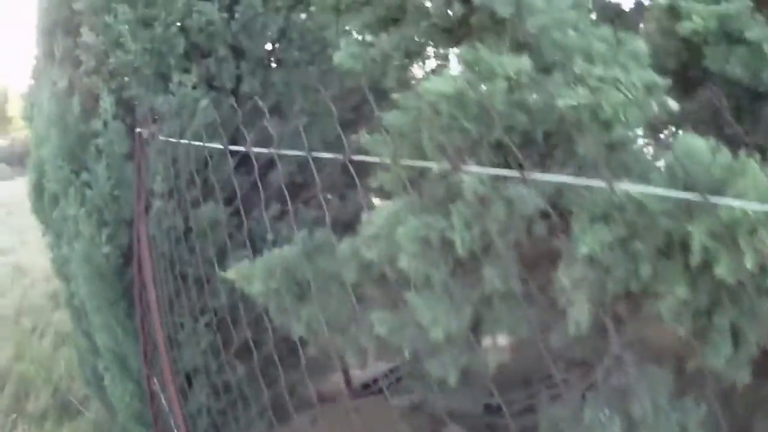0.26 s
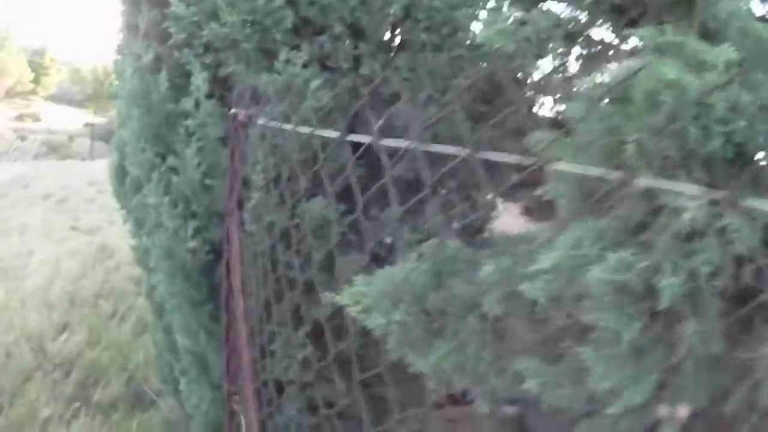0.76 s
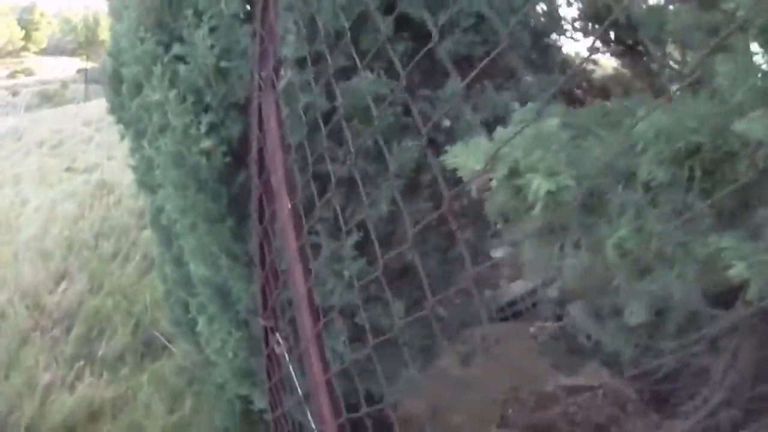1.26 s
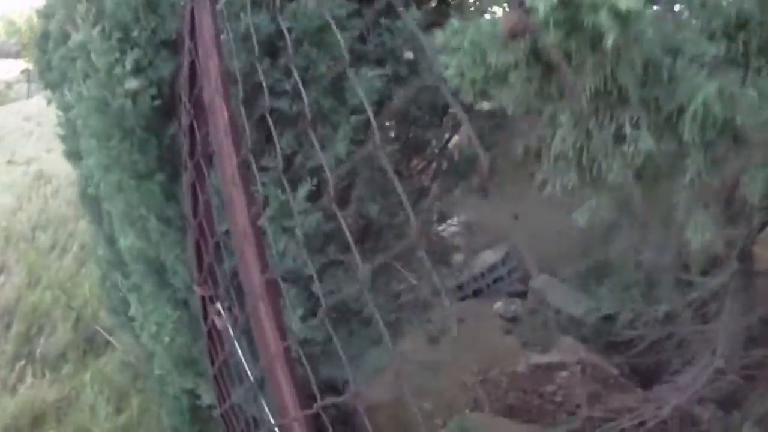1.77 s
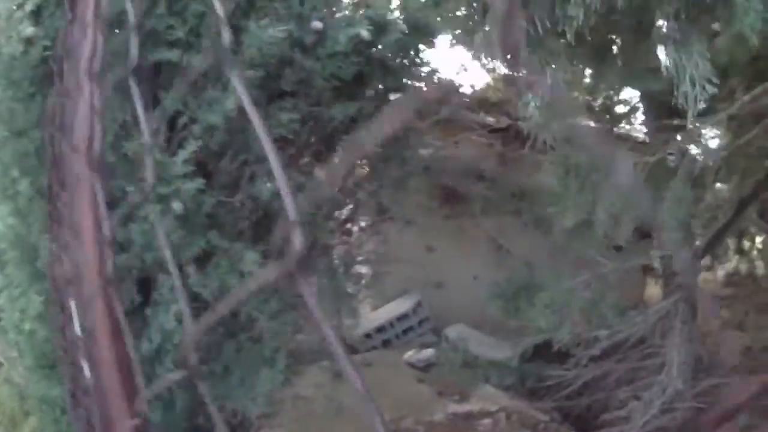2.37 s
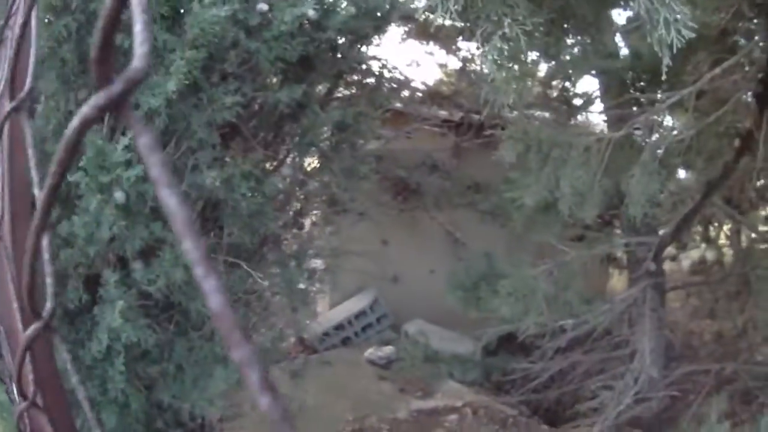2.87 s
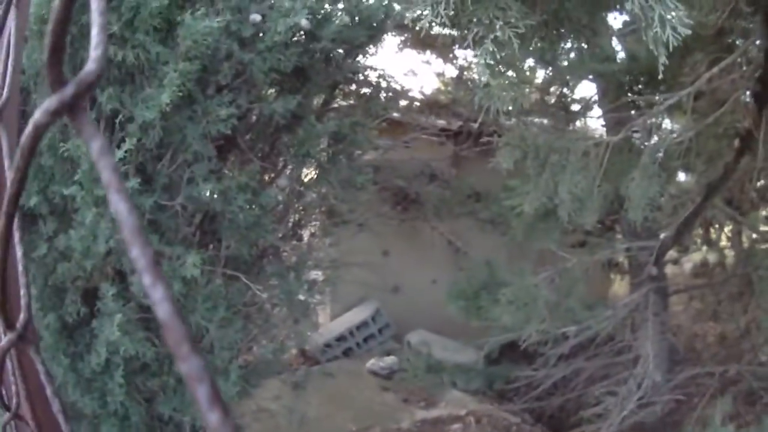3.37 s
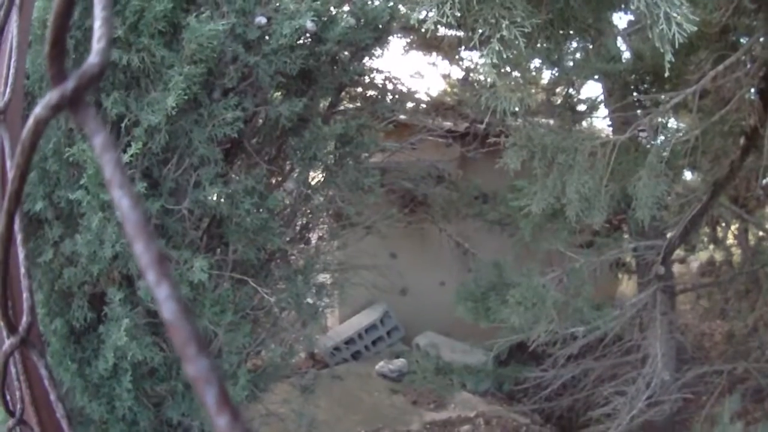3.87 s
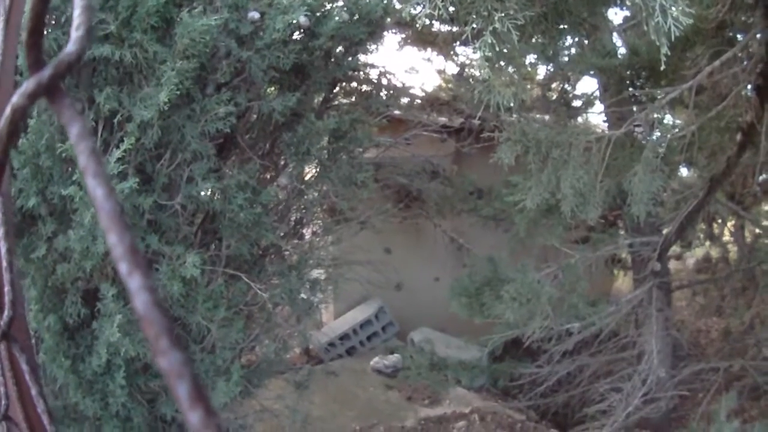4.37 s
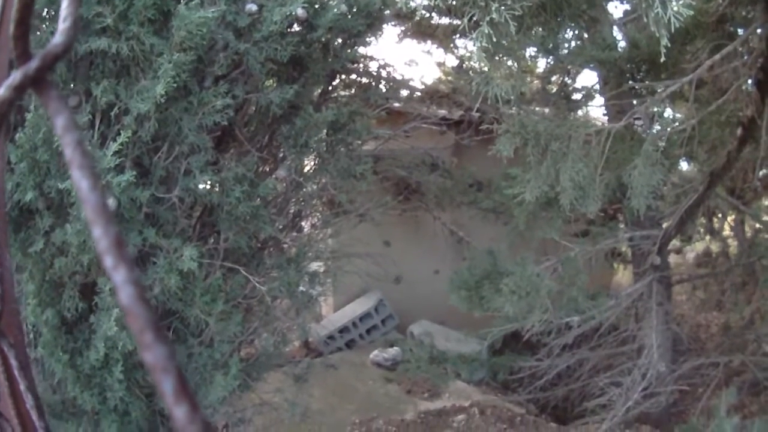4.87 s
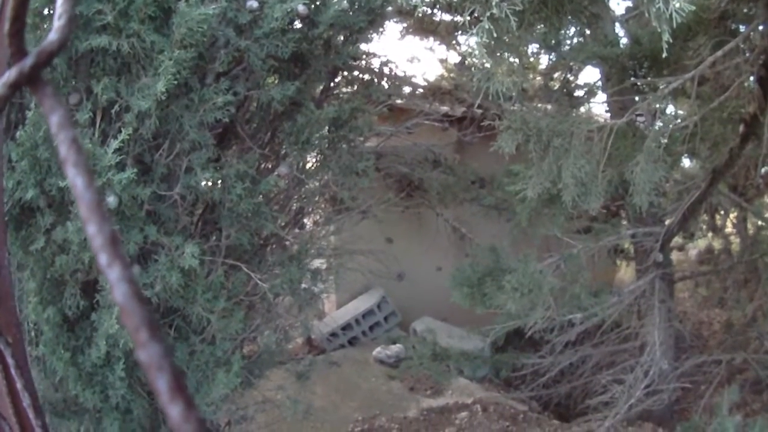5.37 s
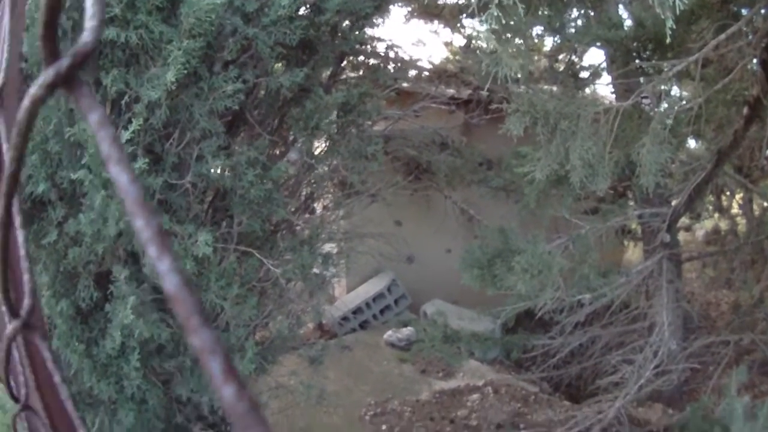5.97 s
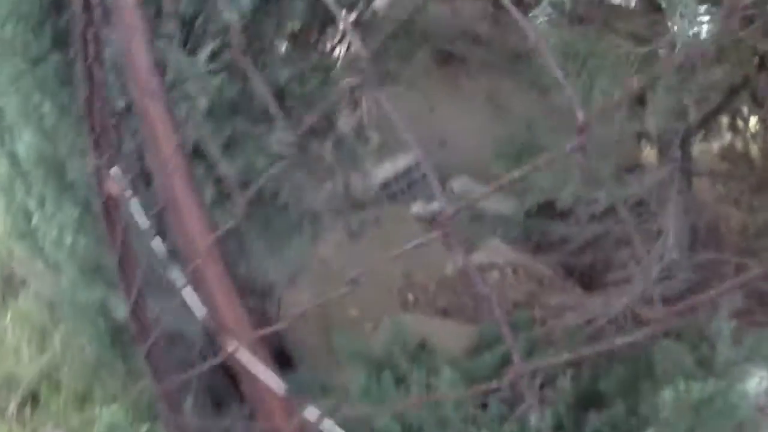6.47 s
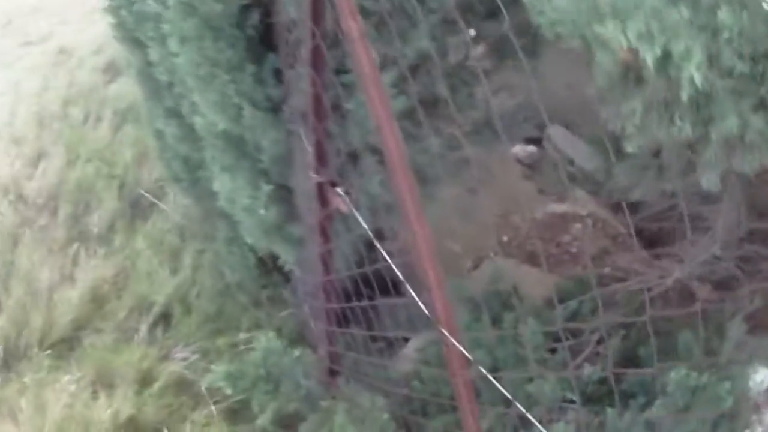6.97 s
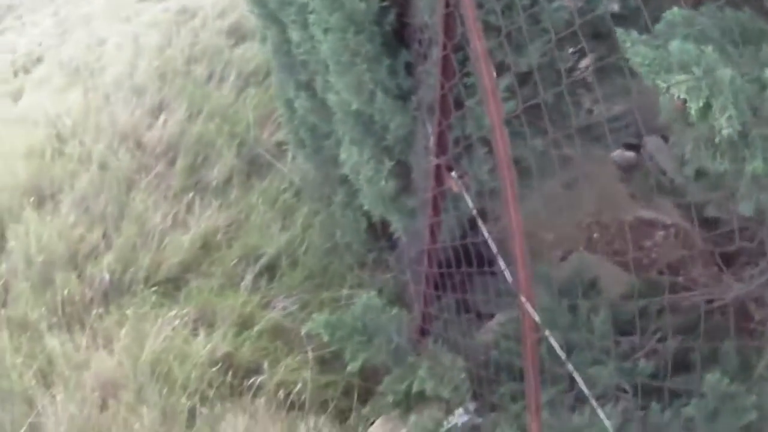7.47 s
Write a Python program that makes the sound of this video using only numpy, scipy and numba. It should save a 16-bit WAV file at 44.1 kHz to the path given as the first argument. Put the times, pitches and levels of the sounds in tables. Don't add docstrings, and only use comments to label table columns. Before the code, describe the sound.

Close, boxy handling rubs and ticks with faint snapping twigs, sharp clacks against wire mesh, then a loud scraping slide through long grass.

```python
import sys
import numpy as np
from scipy import signal
from scipy.fft import rfft, irfft
from scipy.io import wavfile
from scipy.ndimage import uniform_filter1d
from numba import njit

SR = 44100
rng = np.random.default_rng(int(sys.argv[2]) if len(sys.argv) > 2 else 0)


def voltage_ratio(level):
    return 10 ** (np.asarray(level, float) / 20)


def wav_record(signal):
    frames = np.transpose(np.atleast_2d(signal))
    bounded = np.clip(frames, -1, 1)
    quanta = np.round(bounded * 32767).astype(np.int16)
    wavfile.write(sys.argv[1], SR, quanta)


N = 340893

# frequency in Hz, density in dB per Hz.
RASP_COLOUR = [(1880, -44.5), (3200, -5), (3800, 4), (4200, -4), (4580, 1), (4760, -0.5), (4950, -9),
               (5310, -5), (6200, -2.5), (7640, -14.5), (9000, -20), (11700, -27), (19800, -120)]
# frequency in Hz, density in dB per Hz.
CLICK_COLOUR = [(1880, -16.5), (3200, -5.5), (6140, -5.5), (8600, -25), (11500, -15.5), (15200, -16),
                (16500, -9)]
# frequency in Hz, density in dB per Hz.
LEAF_COLOUR = [(5290, -38), (9000, -14.5), (10100, -10), (11800, -1), (13300, -1.5), (15100, -3),
               (16000, 0.5)]


def unit(x):
    return x / np.sqrt(np.mean(x ** 2))


def filtered(x, design):
    return signal.sosfilt(design, x)


def highpass(x, order, hz):
    return filtered(x, signal.butter(order, hz, "high", fs=SR, output="sos"))


@njit
def svf(x, hz, width):
    y, band, low = np.empty(len(x)), 0., 0.
    for i in range(len(x)):
        g, k = np.tan(np.pi * hz[i] / SR), width / hz[i]
        v = (band + g * (x[i] - low)) / (1 + g * (g + k))
        band, low, y[i] = 2 * v - band, low + 2 * g * v, k * v
    return y


def svf_twice(x, hz, width):
    return svf(svf(x, hz, width), hz, width)


def colour(x, points, size=2048):
    hz, db = np.transpose(points)
    log_hz = np.log(np.maximum(np.arange(size // 2 + 1), .5) * SR / size)
    cepstrum = irfft(np.log(voltage_ratio(np.interp(log_hz, np.log(hz), db))))
    cepstrum[1:size // 2] *= 2
    cepstrum[size // 2 + 1:] = 0
    response = irfft(np.exp(rfft(cepstrum)))
    return signal.fftconvolve(x, response / np.sqrt(np.sum(response ** 2)))[:N]


def drift(rate):
    k = int(SR / rate)
    held = np.repeat(rng.standard_normal(N // k + 1), k)
    return unit(uniform_filter1d(held, k)[:N])


def grains(rate, spread_db, smooth):
    chance = rng.random(N) < rate / SR
    size_db = spread_db * np.minimum(rng.exponential(size=N), 2.0)
    slips = chance * rng.standard_normal(N) * voltage_ratio(size_db)
    return unit(unit(slips) + smooth * rng.standard_normal(N))


def strokes(table, attack, release, rest_db):
    t = np.arange(0, N + 64, 64) / SR
    s, hold, db = np.transpose(table)[:, :, None]
    rise = attack * np.maximum(s - t, 0)
    fall = release * np.maximum(t - s - hold, 0)
    total = 10 * np.log10(np.sum(voltage_ratio(db - rise - fall) ** 2, axis=0) + voltage_ratio(rest_db) ** 2)
    return np.interp(np.arange(N) / SR, t, total)


def shell(ring, lid, ring_hz, width_hz):
    # frequency in Hz, width in Hz, level in dB.
    lid_modes = [(977, 48, -5.5), (1109, 243, 0), (1404, 244, -6.5), (1565, 150, -7.5)]
    steep = signal.cheby2(6, 40, 3000, fs=SR, output="sos")
    narrow = svf_twice(ring, ring_hz, width_hz)
    skirt = voltage_ratio(-10) * svf(ring, ring_hz * 1.185, 430.0)
    plate = sum(voltage_ratio(db) * svf(lid, np.full(N, 1. * hz), 1. * width) for hz, width, db in lid_modes)
    return filtered(narrow + skirt, steep), filtered(highpass(plate, 3, 820), steep)


def contacts(table, shape, ring_hz, width_hz, gains_db, treble):
    push = np.full((3, N + SR), 1e-18)
    jitter = rng.standard_normal((len(table), 15000))
    t = np.arange(15000) / SR
    for (s, db, lid, edge, length, *more), noise in zip(table, jitter):
        force, sharp = shape(t, noise, np.clip(length, .004, .3), *more)
        at = int(s * SR)
        push[:, at:at + len(t)] += voltage_ratio(db + np.array([[0], [lid], [edge]])) * [force, force, sharp]
    push = push[:, :N] * voltage_ratio(np.array(gains_db))[:, None]
    return sum(shell(push[0], push[1], ring_hz, width_hz)) + colour(push[2], treble)


def rings(table, rough=0.):
    out, t = np.zeros(N + SR), np.arange(SR // 2) / SR
    tremble = uniform_filter1d(rng.standard_normal((len(table), len(t))), size=40) * np.sqrt(40) / 2
    for (s, hz, db, t60), shake in zip(table, tremble):
        wave = np.sin(2 * np.pi * hz * t + rough * shake * np.minimum(t * hz, 1))
        out[int(s * SR):][:len(t)] += voltage_ratio(db - 60 * t / max(t60, .004)) * wave
    return out[:N]


def outdoor_floor():
    # frequency in Hz, density in dB per Hz.
    hiss_colour = [(18, -47), (30, -19), (229, -5), (298, -4.5), (694, -4.5), (904, -1), (1380, -5),
                   (1840, -19), (2280, -20.5), (3050, -18.5), (8760, -37.5), (15200, -28), (16500, -29)]
    hiss = unit(colour(rng.standard_normal(N), hiss_colour))
    whine = np.sin(2 * np.pi * 7880 * np.arange(N) / SR)
    return voltage_ratio(-50.5 + .5 * drift(7.2)) * hiss + voltage_ratio(-84) * whine


def grip():
    # time in seconds, ring in Hz, palm level in dB, lid over ring in dB.
    grip_rows = [(0.0, 1780, -56, -15), (0.08, 1895, -46, -9.5), (0.22, 2040, -54, -6.5),
                 (0.4, 1860, -45.5, -7), (0.54, 1890, -50.5, -9), (1.0, 1800, -51, 1),
                 (1.17, 1990, -56, -8), (1.32, 1810, -58.5, -3.5), (1.45, 1870, -47, -9.5),
                 (1.64, 1820, -49.5, -6), (1.78, 1990, -49.5, -10), (2.0, 1980, -50.5, -11.5),
                 (2.13, 1740, -58, -6), (2.45, 1930, -56, -4), (2.7, 1770, -53.5, -6.5),
                 (3.05, 1980, -47.5, -8), (3.24, 1964, -55, -10.5), (3.4, 1864, -54, -6),
                 (3.85, 1900, -46.5, -4), (4.22, 1850, -60.5, -4), (4.63, 1884, -48, 2.5),
                 (5.21, 1800, -62.5, -11), (5.73, 1690, -56.5, 2), (5.85, 1846, -47, -4),
                 (5.98, 1880, -45, -1), (6.2, 1840, -61, -6), (6.69, 1824, -54.5, -5.5),
                 (7.02, 2052, -53, -11), (7.28, 1965, -58, -8.5), (7.55, 1885, -58, -10),
                 (7.73, 1920, -60, -19)]
    s, *columns = np.transpose(grip_rows)
    return [np.interp(np.arange(N) / SR, s, column) for column in columns]


def hand_strokes():
    # start in seconds, hold in seconds,
    # ring in dB, rasp over ring in dB.
    stroke_rows = [(0.03, 0.054, -23.5, -22.5), (0.14, 0.035, -34, -21), (0.22, 0.024, -34.5, -24),
                   (0.34, 0.11, -29.5, -22.5), (0.51, 0.061, -25.5, -23.5), (0.62, .14, -37, -25.5),
                   (0.86, 0.12, -43.5, -21), (1.12, 0.19, -29.5, -29), (1.39, 0.18, -29, -24.5),
                   (1.63, 0.026, -30.5, -24), (1.745, 0.1, -31, -26.5), (1.86, 0.15, -29.5, -29),
                   (6.27, 0.019, -42, -20), (6.38, 0.021, -37.5, -17.5), (6.5, 0.049, -29, -23.5),
                   (6.6, 0.034, -42, -20), (6.72, 0.21, -28, -25.5), (6.9, 0.06, -22.5, -34),
                   (6.99, 0.075, -22.5, -33), (7.085, 0.15, -26, -28), (7.3, 0.22, -30.5, -24),
                   (7.57, 0.079, -27.5, -26),
                   (2.076, 0.066, -45.5, -16), (2.247, 0.025, -37, -21.5), (2.436, 0.033, -37, -27),
                  (2.826, .1, -38, -23), (2.964, 0.087, -30, -21.5), (3.043, 0.052, -28, -22.5),
                  (3.236, 0.053, -30.5, -28), (3.308, 0.088, -36.5, -21.5), (3.493, 0.11, -34.5, -19.5),
                  (3.605, 0.1, -31.5, -18), (3.727, 0.21, -31.5, -20), (4.031, 0.095, -43.5, -23),
                  (4.44, 0.29, -53, -21), (4.9, 0.027, -45, -31), (5.863, 0.33, -38.5, -22)]
    moves = stroke_rows
    attack, release = 172, 520
    ring_db = strokes([(s, hold, db) for s, hold, db, _ in moves], attack, release, -55)
    rasp_db = strokes([(s, hold, db + up) for s, hold, db, up in moves], attack, release, -72)
    return ring_db, rasp_db


def rubbing(ring_db, ring_hz, body_db, lid_db, rasp_db):
    # frequency in Hz, density in dB per Hz.
    palm_colour = [(15, -46), (25, -20), (199, -4.5), (240, -1), (549, 5.5), (744, 3), (800, -26),
                   (1040, -39), (1760, -120)]
    flutter = np.minimum(.5 * drift(42) + 1.16 * drift(120), 2.5)
    scrape = grains(2500, 4.0, 1.26)
    lid_scrape = grains(900, 1.8, 1.0) * voltage_ratio(flutter + drift(60))
    wander_hz = ring_hz * (1 + 0.032 * drift(45))
    ring, lid = shell(scrape * voltage_ratio(flutter), lid_scrape, wander_hz, 340.)
    body = colour(grains(300, 3.3, 0.97) * voltage_ratio(flutter + .5 * drift(25)), palm_colour)
    rasp = colour(scrape * voltage_ratio(0.57 * flutter + 1.7 * drift(28)), RASP_COLOUR)
    flank_band = signal.cheby2(3, 30, [1900, 3150], "band", fs=SR, output="sos")
    flank = filtered(scrape * voltage_ratio(flutter), flank_band)
    pressed = unit(ring) + voltage_ratio(lid_db) * unit(lid)
    drag = unit(rasp) + voltage_ratio(-0.5) * unit(flank)
    return voltage_ratio(ring_db) * pressed + voltage_ratio(body_db) * unit(body) + voltage_ratio(rasp_db) * drag


def leaves(swish_db):
    # start in seconds, peak in dB, 4-8 kHz share in dB.
    snap_rows = [(0.0318, -49, 0), (0.68, -32, -5), (1.6561, -33, -7), (1.6694, -38, -9),
                 (1.6945, -41, -15), (1.8986, -36, -20), (1.9824, -37, -19), (2.252, -33.5, -5),
                 (2.429, -53, 13), (2.372, -48, 0), (3, -50, 8), (2.5183, -30, -8), (3.32, -33, -12),
                 (3.4032, -43, -14), (3.904, -43.5, 19), (4, -43.5, 2), (3.195, -55, 14), (1.026, -56, 16),
                 (5.5542, -54, 14)]
    high, mid = np.zeros((2, N))
    t = np.arange(300) / SR
    for (s, db, share_db), noise in zip(snap_rows, rng.standard_normal((len(snap_rows), len(t)))):
        high[int(s * SR):][:len(t)] += voltage_ratio(db - 3.0 - 60 * t / 0.013) * noise
        mid[int(s * SR):][:len(t)] += voltage_ratio(db + share_db - 2.0 - 60 * t / 0.0039) * noise
    swish = voltage_ratio(swish_db + 1.0 * drift(35)) * grains(2400, 2.3, 0.71)
    return colour(swish + high, LEAF_COLOUR) + colour(mid, RASP_COLOUR)


def catches():
    # peak time in seconds, peak in dB, ring in Hz, width in seconds.
    catch_rows = [(0.0443, -17, 1750, 0.0016), (0.0698, -13.5, 1850, 0.005), (0.0917, -17, 1760, 0.0015),
                  (0.0967, -15, 1960, 0.0034), (0.1077, -18, 1850, 0.0022), (0.21, -19, 1970, 0.0027),
                  (0.2258, -11.5, 2030, 0.005), (0.2319, -16, 1870, 0.0014), (0.2348, -15, 1880, 0.0015),
                  (0.4443, -22, 1910, 0.0049), (0.5304, -14, 1940, 0.0018), (0.5407, -12.5, 1884, 0.0051),
                  (0.55, -18, 1900, 0.003), (0.565, -18, 1840, 0.0042), (1.1445, -19.5, 1920, 0.0065),
                  (1.1743, -20, 1950, 0.0047), (1.3933, -19.5, 1750, 0.0032), (1.5322, -19, 1810, 0.0024),
                  (1.8538, -17, 1990, 0.0033), (3.052, -15, 1920, 0.0027), (3.0577, -14, 1840, 0.0031),
                  (3.0697, -11, 2040, 0.0027), (3.2376, -21, 1970, 0.0022), (3.2709, -21, 1920, 0.0039),
                  (3.6162, -16, 1926, 0.0076), (3.6213, -18, 1890, 0.0016), (3.685, -18, 1880, 0.0077),
                  (3.698, -21, 1800, 0.0036), (6.1113, -8.5, 1900, 0.0047), (6.1208, -15, 1880, 0.0025),
                  (6.5238, -17.5, 1770, 0.0044), (6.8956, -17, 1900, 0.0047), (6.9216, -13.5, 1960, 0.0024),
                  (6.9501, -13, 2030, 0.0062), (6.9742, -11.5, 1900, 0.0036), (6.9891, -7, 1990, 0.0029),
                  (6.9977, -10.5, 2010, 0.0046), (7.003, -13, 2040, 0.0016), (7.0125, -9, 2020, 0.0059),
                  (7.0217, -11.5, 2090, 0.0024), (7.0309, -9, 1980, 0.0033), (7.035, -15, 2020, 0.0023),
                  (7.0432, -14, 1990, 0.0023), (7.0599, -12, 2070, 0.0037), (7.1187, -14, 1990, 0.0077)]
    driven_rows = [
        (5.8525, 0, 1860, 0.006),
        (5.859, 1, 1900, 0.005),
        (4.6625, -3, 1890, 0.0045),
        (4.6705, -9, 1900, 0.006),
        (0.2185, -17, 1990, 0.004),
    ]
    rows = [*catch_rows, *driven_rows]
    out, t = np.zeros(N), np.arange(-600, 600) / SR
    tremble = uniform_filter1d(rng.standard_normal((len(rows), len(t))), size=90) * np.sqrt(90)
    for (s, db, hz, width), shake in zip(rows, tremble):
        side = width * np.where(t < 0, 1.05, 1.25)
        swell = voltage_ratio(db - 1.0 - 7 * (2 * t / side) ** 2)
        out[int(s * SR) - 600:][:len(t)] += swell * np.sin(2 * np.pi * hz * t + .3 * shake)
    return filtered(out, signal.butter(3, [1300, 2550], "band", fs=SR, output="sos"))


def scuff(t, noise, length):
    force = 0.09 * noise * np.sin(np.pi * np.minimum(t / length, 1) ** 0.61) ** 2
    return force, force


def scuffs(ring_hz):
    # start in seconds, peak in dB, lid in dB, rasp in dB, length in seconds.
    scuff_rows = [(0.082, -16, -2.5, -21, 0.028), (0.2175, -15, -4, -31, 0.024),
                  (1.27, -26, -10, -28, 0.037), (1.553, -24, -13, -32, 0.014),
                  (1.745, -19.5, -20, -35, 0.062), (1.922, -28, -14, -33, 0.02),
                  (4.688, -26, -5, -46, 0.098), (5.486, -19.5, -7, -35, 0.032),
                  (5.505, -28.5, -10, -39, 0.08), (5.897, -16, -10, -28, 0.012),
                  (5.905, -18, -8, -41, 0.035), (6.122, -13, -15, -28, 0.012), (0.515, -19, -8, -24, 0.03),
                  (1.66, -34.5, 17, -12, 0.039), (3.259, -22, -29, -45, 0.034),
                  (4.715, -30, 9.5, -33, 0.02), (5.963, -14, -13, -43, 0.016),
                  (6.1044, -18, -8, -30, 0.024), (7.215, -21, -30, -45, 0.021),
                  (0.141, -23, -13, -27, 0.033),
        (3.206, -21, -22, -35, 0.049),
    ]
    return contacts(scuff_rows, scuff, ring_hz, 330.0, [31, 28, 16], RASP_COLOUR)


def crackle(rubbed):
    # frequency in Hz, density in dB per Hz.
    crackle_colour = [(3000, -28), (5500, -6), (8500, 0), (12000, 3), (16000, 3)]
    pressure = np.minimum(uniform_filter1d(rubbed ** 2, size=90), .025)
    return voltage_ratio(-19.5) * pressure * unit(colour(grains(1500, 2, .8), crackle_colour))


def thumps():
    # start in seconds, peak in dB, frequency in Hz, t60 in seconds.
    thump_rows = [(0.3238, -13, 620, 0.0045), (1.671, -33, 600, 0.03), (3.018, -32.5, 534, 0.042),
                  (3.446, -40.5, 315, 0.021), (3.89, -30, 476, 0.0039), (4.092, -34.5, 710, 0.041),
                  (4.387, -29, 436, 0.013), (4.4216, -8, 950, 0.016), (4.4165, -13, 420, 0.014),
                  (4.574, -30.5, 680, 0.018), (4.828, -40, 275, 0.03), (4.928, -44.5, 251, 0.041),
                  (5.003, -42, 244, 0.038), (5.299, -30, 282, 0.01), (5.466, -29.5, 313, 0.011),
                  (5.75, -32.5, 288, 0.02), (5.847, -25.5, 261, 0.056), (5.858, -25, 374, 0.03),
                  (5.868, -21, 203, 0.032), (5.8765, -7, 700, 0.012), (5.8815, -11, 900, 0.025),
                  (6.079, -24, 260, 0.02), (6.095, -15.5, 610, 0.0049), (6.359, -28.5, 220, 0.0051),
                  (7.133, -39, 380, 0.035), (2.103, -36, 900, 0.008), (2.349, -40, 1100, 0.006),
                  (2.372, -36, 1250, 0.008), (4.349, -42, 500, 0.01), (4.718, -37.5, 560, 0.03),
                  (5.484, -36, 580, 0.02), (5.492, -39, 260, 0.02), (5.639, -45, 330, 0.03),
                  (5.7477, -34.5, 615, 0.021), (5.769, -38, 400, 0.018), (6.664, -42, 700, 0.014),
                  (0.084, -40, 500, 0.05)]
    bumps = rings([(s, hz, db + 10, t60) for s, db, hz, t60 in thump_rows], rough=0.6)
    return highpass(bumps, 3, 125)


def wires():
    # start in seconds, frequency in Hz, level in dB, t60 in seconds.
    wire_rows = [(4.425, 1872, -30, 0.57), (6.108, 665, -31, 0.25), (3.017, 5850, -29, 0.016),
                 (4.659, 6300, -16, 0.02), (4.68, 4640, -53, 0.084), (5.463, 5400, -38, 0.027),
                 (5.463, 5570, -46, 0.063), (5.481, 4500, -32, 0.018), (5.486, 4660, -50, 0.09),
                 (5.878, 4630, -22, 0.02), (6.094, 5750, -30, 0.017), (2.43, 3450, -40, 0.015),
                 (4.43, 1480, -42, 0.12), (4.425, 2250, -46, 0.15), (5.65, 2100, -44, 0.3),
                 (3.905, 4650, -39, 0.02), (0.09, 3800, -42, 0.03), (0.224, 2800, -40, 0.02),
                 (4.418, 5800, -24, 0.012)]
    return rings(wire_rows)


def tap(t, noise, t60):
    click = voltage_ratio(-60 * t / 0.00033) * .5
    rattle = 0.028 * noise * voltage_ratio(-60 * t / t60)
    return click + rattle, click + 0.16 * noise * voltage_ratio(-60 * t / 0.008)


def taps(ring_hz):
    # start in seconds, peak in dB, lid in dB, edge in dB.
    tick_rows = [(0.2694, -12, -15, -25), (0.3239, -14, 0, -14), (0.607, -23, -7, -30),
                 (0.6242, -23, -6, -35), (0.7277, -28, 5, -10), (0.738, -23, -2, -20),
                 (0.7714, -22, -3, -34), (0.864, -34, 8, -18), (0.921, -19.5, -4.5, -32),
                 (1.013, -21, -5.5, -23), (1.0829, -20, -2.5, -22), (2.0322, -25.5, 2, -16),
                 (2.22, -22, -1, -25), (2.3545, -22, -10, -28), (2.5479, -17, -5, -21),
                 (2.597, -21.5, -2, -20.5), (2.623, -23.5, -3.5, -25), (2.7024, -15.5, -5, -20.5),
                 (2.7506, -23, -2.5, -22), (2.823, -32, 4.5, -20), (2.8643, -21, -5.5, -27),
                 (2.9017, -19, -7, -36), (2.9525, -27.5, 3, -20), (6.6253, -21, -4, -26),
                 (7.7064, -18, -14, -45)]
    touch_rows = [(3.017, 3, -17.5, -30.5), (3.0358, -2, -22, -29), (3.0746, -4.5, -10, -32),
                  (3.3446, -10, -5.5, -22.5), (3.3903, -12, -7.5, -20.5), (3.448, -19.5, -10, -18),
                  (3.8482, -8.5, -6, -28), (3.9669, -1.5, -15, -21), (4.0576, -21.5, -11, -20),
                  (4.0727, -20.5, -4.5, -28), (4.269, -22.5, -17, -27), (4.356, -5.5, -4, -15.5),
                  (4.382, -8, -7, -17), (4.3876, -3, -15, -17), (4.5753, -21, -3.5, -39),
                  (4.8284, -25.5, -0.5, -28), (4.925, -13.5, -9.5, -31), (5.01, -16, -13.5, -35),
                  (5.0927, -27.5, -27, -33), (5.1178, -32.5, -10.5, -20), (5.2987, -31.5, 0, -31),
                  (5.4606, -20, -6, -20), (5.4635, -4.5, -5.5, -35), (5.4791, -12, -16, -27),
                  (5.482, -15.5, -5, -28), (5.443, -38, 1, -22), (5.638, -31.5, 1, -25),
                  (5.6471, -29.5, 1, -18), (5.7687, -19, -19, -29), (5.829, -14.5, -8, -29),
                  (5.93, -2, -19, -32), (6.0303, -5.5, -34, -32.5)]
    rattle_t60_s = [0.067] * len(tick_rows) + [0.092] * len(touch_rows)
    rows = [(*row, t60) for row, t60 in zip([*tick_rows, *touch_rows], rattle_t60_s)]
    return contacts(rows, tap, ring_hz, 383.0, [28, 30, 14], CLICK_COLOUR)


def brushes():
    # start in seconds, hold in seconds, level in dB.
    brush_rows = [
        (0.99, .1, -50.5),
        (1.645, .035, -53),
        (1.8, 0.078, -50.5),
        (2.1, .42, -61),
        (6.9, 0.15, -53),
        (7.55, 0.044, -51),
    ]
    level_db = strokes(brush_rows, 90, 90, -73) + 1.4 * drift(40)
    return highpass(colour(voltage_ratio(level_db) * grains(2500, 2.5, .9), LEAF_COLOUR), 4, 12000)


def knock(t, noise, t60, after_db):
    blow = 0.16 * noise * np.minimum(t / 0.00099, 1) * voltage_ratio(-60 * (t / t60) ** 1.21)
    blow = blow + 0.45 * voltage_ratio(-60 * t / 0.00041)
    patches = .75 + .3 * np.abs(np.repeat(noise[:100], 150))
    shiver = 0.15 * noise * patches * voltage_ratio(after_db - 60 * t / 0.27)
    return blow + shiver, blow * voltage_ratio(-60 * t / 0.031) + 0.24 * shiver


def knocks(ring_hz):
    # start in seconds, drive in dB, lid in dB, edge in dB, blow t60 in seconds.
    damped_rows = [(4.4172, 11, -2, -36, 0.016), (5.826, -21, -2, -20, 0.019),
                   (5.845, 4.5, -4.5, -23, 0.031), (5.853, -5, -2, -25, 0.028), (5.864, -9, 0, -23, 0.049),
                   (5.877, 4, 0.5, -29, 0.017), (5.8875, -4, 2, -22, 0.013), (5.8932, -6, 2, -14, 0.011),
                   (4.6756, -6, -17, -30, 0.018), (4.685, -17, -10, -32, 0.013),
                   (6.078, -17, -8, -18, 0.023), (6.08, 2, -5, -16, 0.023), (6.0936, 4, -10, -14.5, 0.042)]
    twang_rows = [
        (4.658, 3, -11, -22, 0.032),
        (5.315, -24, -8.5, -30, 0.018),
        (5.466, -35, -9, -26, 0.05),
        (5.748, -25, 4, -14, 0.033),
        (6.361, -20.5, -4, -14.5, 0.04),
    ]
    damped_db, shiver_db = -36, -12.5
    rows = [(*row, damped_db) for row in damped_rows] + [(*row, shiver_db) for row in twang_rows]
    return contacts(rows, knock, ring_hz, 300.0, [31, 26, 12], CLICK_COLOUR)


def grass():
    # time in seconds, hiss centre in Hz, level in dB.
    grass_rows = [
        (6.66, 5700, -90),
        (6.71, 5840, -66),
        (6.92, 6300, -60),
        (7.0, 6300, -67),
        (7.3, 5600, -67),
        (7.48, 6900, -61.5),
        (7.64, 7200, -56),
        (7.68, 7300, -87),
    ]
    s, hz, db = np.transpose(grass_rows)
    t = np.arange(N) / SR
    hiss = svf_twice(rng.standard_normal(N), np.interp(t, s, hz), 1900.)
    drag = svf_twice(rng.standard_normal(N), np.full(N, 2330.), 390.0)
    level_db = np.interp(t, s, db) + 1.4 * drift(25)
    return voltage_ratio(level_db) * (unit(hiss) + voltage_ratio(20.5) * unit(drag))


def scene():
    ring_hz, body_db, lid_db = grip()
    ring_db, rasp_db = hand_strokes()
    rubbed = rubbing(ring_db, ring_hz, body_db, lid_db, rasp_db)
    rubbed += catches() + scuffs(ring_hz)
    out = outdoor_floor() + rubbed + crackle(rubbed)
    out += leaves(rasp_db - 5.5)
    out += thumps() + wires()
    out += taps(ring_hz) + brushes()
    out += knocks(ring_hz) + grass()
    return out[None]


def top_cut(x):
    return signal.sosfilt(signal.butter(12, 16850, fs=SR, output="sos"), x)


def record(dry):
    bend = highpass(np.minimum(dry ** 2, .4), 3, 190)
    cut = highpass(dry + 0.06 * bend, 1, 25)
    cut = filtered(cut, signal.ellip(8, .2, 60, 15800, fs=SR, output="sos"))
    ceiling = 0.5
    flat = cut / (1 + np.abs(cut / ceiling) ** 14) ** (1 / 14)
    flat = filtered(flat, signal.ellip(8, .2, 60, 16200, fs=SR, output="sos"))
    return top_cut(flat)


dry = scene()
out = record(dry)
wav_record(out)
```